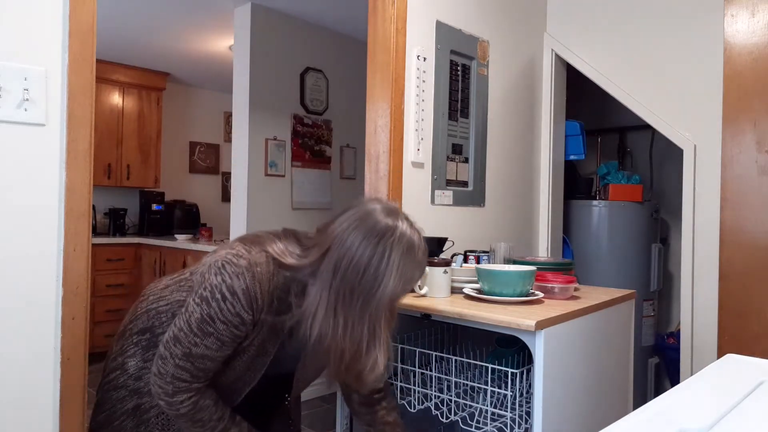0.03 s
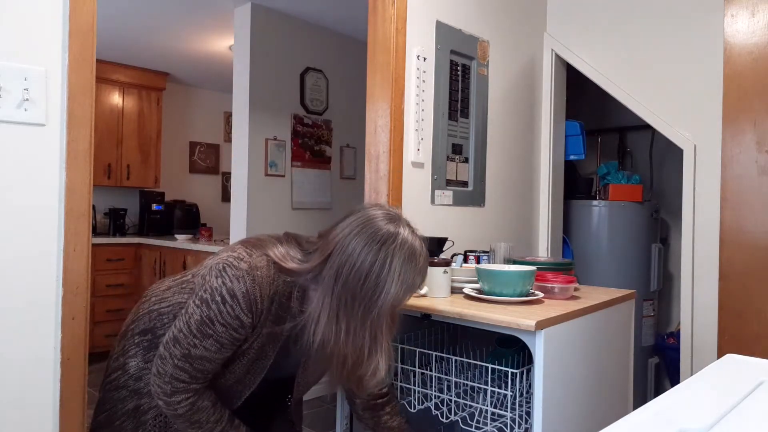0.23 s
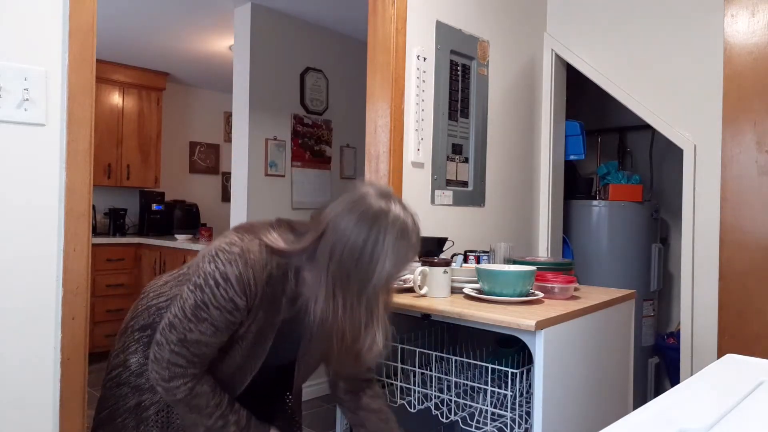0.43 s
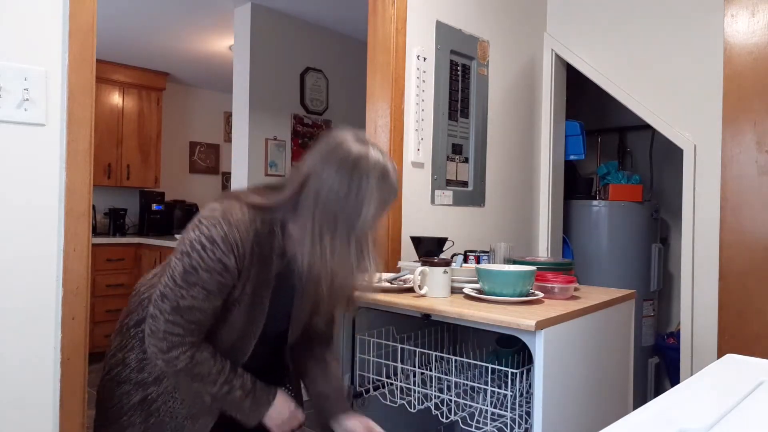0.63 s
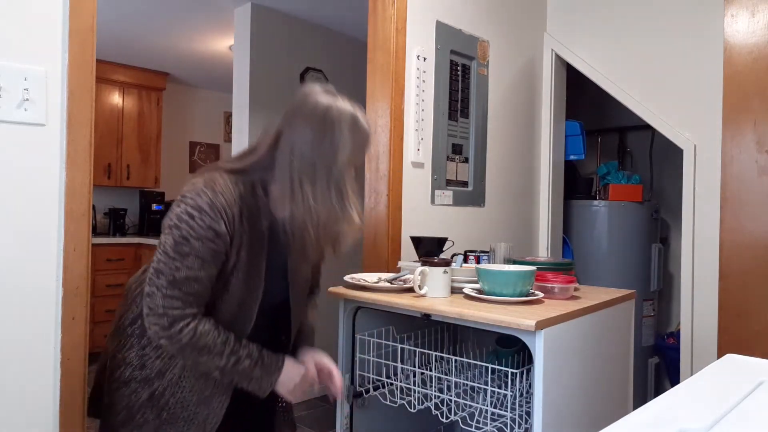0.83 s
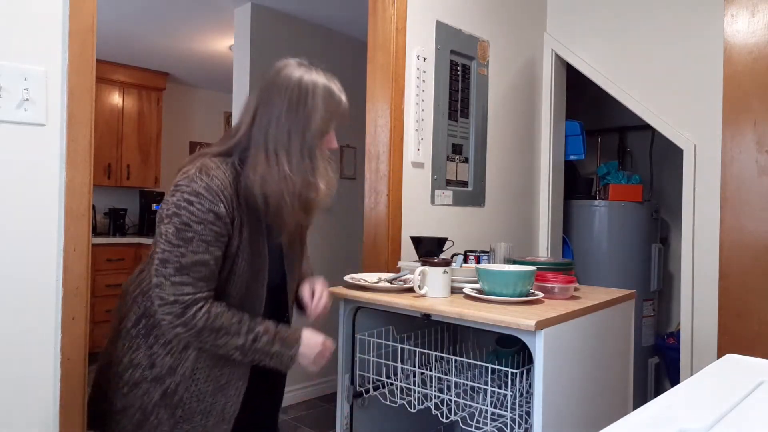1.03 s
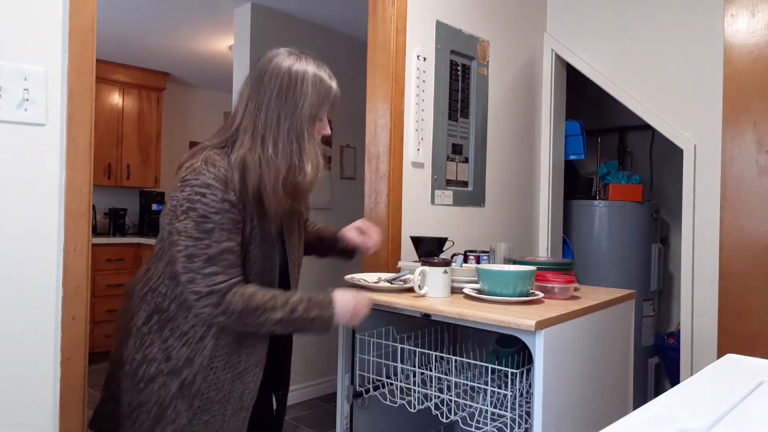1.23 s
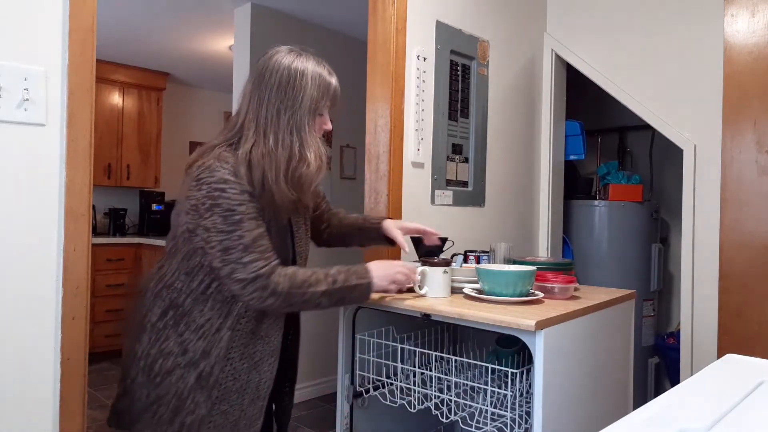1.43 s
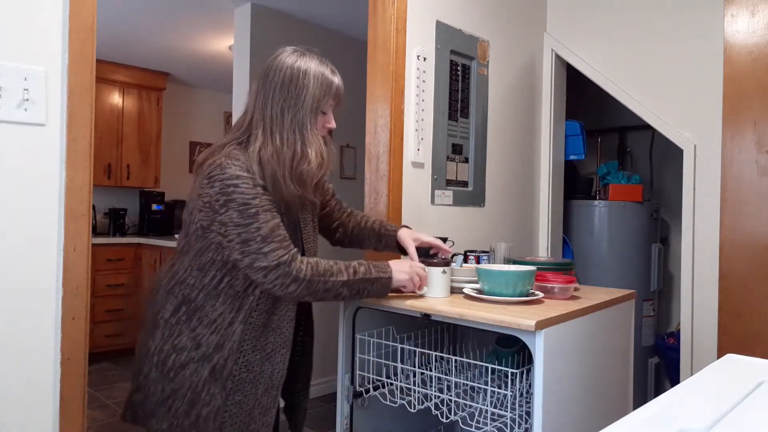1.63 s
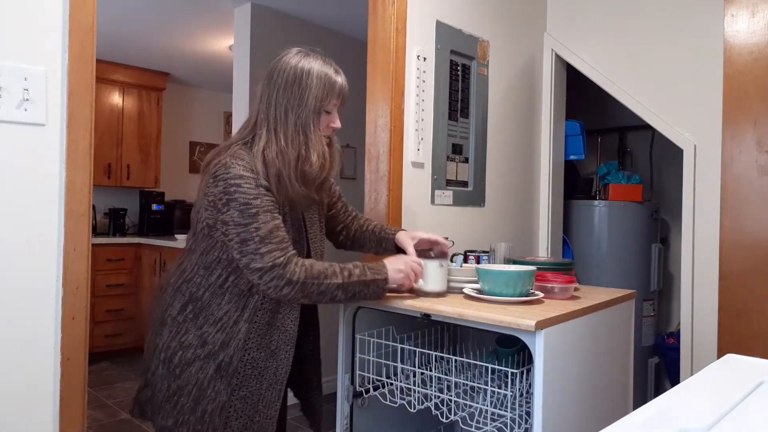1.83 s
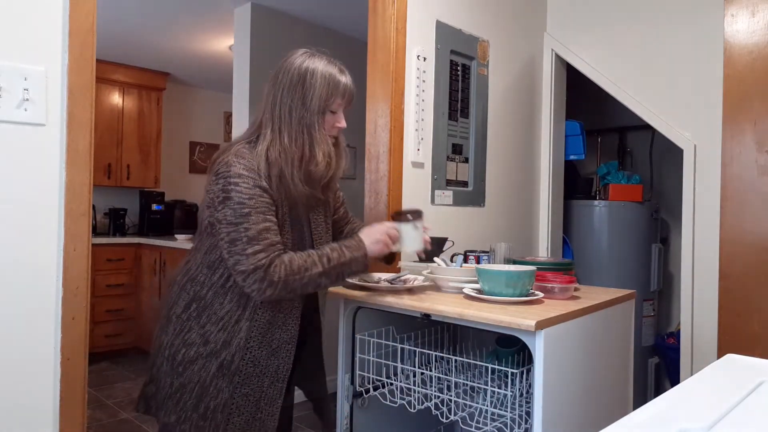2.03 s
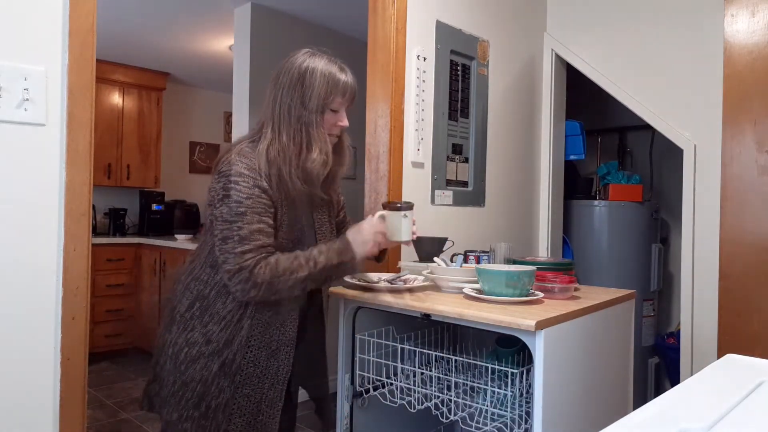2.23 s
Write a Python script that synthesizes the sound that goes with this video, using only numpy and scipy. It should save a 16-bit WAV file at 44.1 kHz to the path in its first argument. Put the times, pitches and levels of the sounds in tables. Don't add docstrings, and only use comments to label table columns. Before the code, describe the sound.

In a small kitchen heard from a few metres, a quick bright rattle of dropped steel cutlery comes first, then faint rustle and sliding crockery, a clink, double wooden knock and thin spoon jingle over low hum.

```python
import sys
import numpy as np
from scipy import signal
from scipy.fft import rfft, irfft
from scipy.io import wavfile
from scipy.ndimage import uniform_filter1d

SR = 44100
rng = np.random.default_rng(int(sys.argv[2]) if len(sys.argv) > 2 else 0)


def volts_from_db(level):
    exponent = np.asarray(level, float) / 20
    return 10 ** exponent


def generate_wav(signal):
    frames = np.transpose(np.atleast_2d(signal))
    scaled = np.clip(frames, -1, 1) * 32767
    pcm = np.round(scaled).astype(np.int16)
    wavfile.write(sys.argv[1], SR, pcm)


N = 101429

# [Hz, dB per Hz]
CRACK = [(25, -46), (50, -25), (160, -11.5), (450, -11.5), (1600, -5), (3000, -9), (5300, -12), (8500, -6),
         (16000, -11.5)]
# [Hz, dB per Hz]
BOARD = [(25, -32), (60, -14), (150, -0.5), (450, -5.5), (900, -3), (2700, -10.5), (5000, -25),
         (16000, -41)]


def cutlery():
    # [s, dB, dB]
    drops = [(0.061, -45, -69), (0.07, -32.5, -57), (.11, -46.5, -58), (.211, -27.5, -41), (.216, -22, -45),
             (0.218, -29.5, -41), (0.233, -17.5, -23), (0.257, -19.5, -24), (0.287, -10.5, -23.5),
             (0.31, -20, -35.5), (0.333, -27.5, -16.5), (.365, -14, -18), (.393, -8.5, -16.5),
             (0.41, -18, -14.5), (.429, -18.5, -21.5), (0.449, -13, -10.5), (0.471, -16, -24.5)]
    # [s, dB]
    shaking = [
        (.2, -57.5),
        (.235, -46),
        (.3, -37),
        (.46, -39),
        (.5, -59),
        (.56, -48.5),
        (.62, -67),
    ]
    start_s, dull_db, bright_db = np.transpose(drops)
    split_hz = 2800
    below = signal.butter(2, split_hz, fs=SR, output="sos")
    above = signal.butter(2, split_hz, "high", fs=SR, output="sos")
    dull = signal.sosfilt(below, colour(blows(start_s, dull_db), CRACK))
    bright = signal.sosfilt(above, colour(blows(start_s, bright_db), CRACK))
    shake = volts_from_db(level_over_time(shaking))
    rattle = colour(shake * grains(per_s=1500, uneven_db=0.62), CRACK)
    loose = jostle(shake, low_hz=700, high_hz=15000, per_s=54)
    return volts_from_db(20) * (dull + bright) + rattle + volts_from_db(-20.5) * loose


def jostle(push, low_hz, high_hz, per_s):
    pieces = [(hz, 0.041 * hz, 0) for hz in np.geomspace(low_hz, high_hz, num=18)]
    return body(pieces, lambda: push * grains(per_s, uneven_db=4))


def steel_rings():
    # [s, dB, Hz]
    forks_and_knives = [(.236, -28.5, 4450), (.236, -36.5, 8380), (.24, -33, 11000), (.24, -38.5, 9900),
                        (.255, -22, 1640), (.257, -28.5, 4500), (.255, -36.5, 10950), (.256, -35, 15100),
                        (.29, -24.5, 1632), (.292, -33.5, 780), (.333, -31, 1330), (.336, -30, 6420),
                        (.34, -25.5, 4550), (.34, -24, 8470), (.357, -27.5, 7870), (.36, -28.5, 6360),
                        (.364, -20.5, 13500), (.366, -29.5, 4540), (.37, -26, 1670), (.387, -30, 4584),
                        (.385, -29, 6350), (.393, -26, 8030), (.392, -27, 780), (.405, -24.5, 1654),
                        (.403, -30.5, 6200), (.42, -22, 1710), (.415, -32.5, 780), (.44, -28, 4557),
                        (.45, -20.5, 13610), (.452, -24, 8530), (.452, -29.5, 15100), (.455, -32.5, 6300),
                        (.47, -33, 1368), (.474, -22.5, 11320), (.476, -24, 8550), (.49, -29.5, 13700),
                        (.5, -29.5, 11200)]
    return volts_from_db(20.5) * pings(forks_and_knives, ring_s=0.006, swell_s=0.001, spread_hz=73)


def tub_booms():
    # [s, dB, Hz]
    tub = [(.085, -58.5, 295.5), (.222, -38.5, 303.8), (.3, -31.5, 294.4), (.33, -47, 301.6),
           (.4, -36, 300.2), (.47, -38, 292.6), (.55, -51.5, 297.4), (.99, -58, 298), (1.27, -59.5, 292),
           (1.39, -59.5, 299), (1.5, -47.5, 303), (1.785, -42.5, 317), (2.14, -62, 288.6)]
    return volts_from_db(29.5) * pings(tub, ring_s=0.032, swell_s=0.012, spread_hz=7)


def slide():
    # [s, dB]
    pushes = [(.58, -61), (.7, -67.5), (.77, -93), (.985, -78), (1.0, -60), (1.08, -71.5), (1.165, -84),
              (1.18, -59.5), (1.23, -57), (1.328, -64.5), (1.334, -61.5), (1.4, -53), (1.5, -47),
              (1.52, -44.5), (1.6, -70.5), (1.68, -57)]
    # [s, dB]
    lift = [
        (1.86, -42.5),
        (1.92, -46.5),
        (1.96, -45.5),
        (2.02, -45),
        (2.1, -56),
        (2.18, -63),
        (2.3, -79),
    ]
    push = volts_from_db(level_over_time(pushes)) + volts_from_db(level_over_time(lift))
    return colour(push * grains(per_s=740, uneven_db=5.9), BOARD)


def bumps():
    # [s, dB]
    thuds = [(0.086, -51.5), (0.226, -39), (0.301, -38.5), (0.459, -42.5), (.6, -58), (0.993, -59),
             (1.267, -56), (1.501, -49.5), (1.794, -70), (1.88, -69), (1.96, -76), (2.089, -48.5),
             (2.2, -56.5)]
    # [Hz, dB per Hz]
    thud_colour = [(25, -32), (55, -4), (150, -4.5), (300, -1.5), (700, -28.5), (16000, -72.5)]
    start_s, level_db = np.transpose(thuds)
    return volts_from_db(24.5) * colour(blows(start_s, level_db, chatter_s=0.06), thud_colour)


def mug_clinks():
    # [s, dB]
    clinks = [
        (1.704, -28),
        (1.712, -35.5),
        (1.72, -40),
        (1.74, -56),
        (1.755, -62),
    ]
    # [Hz, Hz, dB]
    mug_modes = [(513, 180, -16), (780, 157, -6.5), (930, 244, -0.5), (1220, 220, -14), (2850, 190, -8),
                 (3757, 106, -14), (5236, 130, -22.5), (7030, 170, -27), (9040, 190, -24), (9900, 80, -29),
                 (10750, 130, -24.5), (11800, 90, -35), (13800, 80, -38)]
    tick = colour(blows(*np.transpose(clinks)), BOARD)
    return volts_from_db(20) * struck(clinks, mug_modes) + volts_from_db(13) * tick


def board_knocks():
    # [s, dB]
    knocks = [
        (1.791, -27),
        (1.801, -26.5),
        (1.822, -35.5),
        (1.924, -42),
    ]
    # [Hz, dB per Hz]
    knock_colour = [(25, -65), (50, -13), (150, 1), (310, -2.5), (640, -10), (1500, -13), (4000, -26),
                    (16000, -37)]
    return volts_from_db(19.5) * colour(blows(*np.transpose(knocks)), knock_colour)


def spoon():
    # [s, dB]
    jingles = [
        (1.836, -29.5),
        (1.85, -45),
        (1.868, -54),
        (1.922, -44.5),
        (2.022, -51),
        (2.151, -54.5),
    ]
    # [Hz, Hz, dB]
    spoon_modes = [(5610, 150, -16), (6200, 42, -26), (6390, 29, -13), (6600, 55, -9), (7790, 26, -15.5),
                   (8600, 72, -3), (9280, 45, -1.5), (10200, 85, -2.5), (11900, 48, -11), (12400, 67, -9),
                   (13480, 54, -9), (14200, 40, -14), (14300, 28, -9), (15100, 39, -22)]
    hiss = colour(blows(*np.transpose(jingles)), CRACK)
    return volts_from_db(15.5) * struck(jingles, spoon_modes) + volts_from_db(18.5) * hiss


def crockery_touches():
    # [s, dB, Hz]
    touches = [(.65, -58, 1880), (.705, -66.5, 2140), (.995, -66, 664), (1.172, -61, 2920),
               (1.187, -63, 1097), (1.21, -57, 872), (1.222, -55, 2764), (1.25, -73, 11900),
               (1.26, -64, 2780), (1.31, -70, 2705), (1.332, -54.5, 927), (1.404, -59, 850),
               (1.43, -64, 14740), (1.457, -51.5, 1793), (1.465, -53, 2390), (1.499, -50.5, 1260),
               (1.5, -49.5, 2850), (1.508, -54.5, 4420), (1.507, -63.5, 6180), (1.509, -65, 8320),
               (1.52, -50.5, 818), (1.625, -62, 2850), (1.629, -63, 1866), (1.85, -43, 2543),
               (1.868, -49.5, 4940), (1.88, -56, 5600), (1.912, -42, 2950), (1.92, -52, 4400),
               (1.925, -54, 6150), (1.975, -54, 4660), (1.98, -48, 2850), (2.0, -51, 4634),
               (2.004, -47.5, 1100), (2.037, -54.5, 4620), (2.04, -49, 2795), (2.088, -49, 2410),
               (2.09, -57, 4490), (2.125, -58, 2400), (2.15, -58, 4880), (2.18, -62, 4850),
               (2.21, -67, 3340), (2.23, -66, 2430), (2.24, -68, 1467)]
    return volts_from_db(27) * pings(touches, ring_s=0.0083, swell_s=0.00091, spread_hz=87.5)


def sleeve():
    # [s, dB]
    rustle = [(.66, -83), (.72, -74), (.8, -104), (.93, -87), (1.01, -67.5), (1.05, -62.5), (1.1, -101),
              (1.17, -77), (1.24, -73), (1.3, -120), (1.405, -95), (1.425, -63), (1.52, -92), (1.62, -107),
              (2.1, -72), (2.16, -70.5), (2.25, -112.5)]
    # [Hz, dB per Hz]
    cloth = [(300, -38), (3000, -11), (6000, -6), (8600, -0.5), (16000, -13.5)]
    return volts_from_db(level_over_time(rustle) + 1) * colour(grains(per_s=6000, uneven_db=7.5), cloth)


def kitchen(x, rings):
    # [Hz, s]
    room_t60 = [(60, 0.9), (250, 1), (1000, 0.29), (4000, 0.49), (12000, 0.28)]
    # [Hz, Hz, dB]
    standing = [(153, 30, -26.5), (306, 20, -29)]
    direct_db, build_s = -14.5, 0.0028
    bend_db = 612
    early_s, late_db = 0.011, -12
    dip_hz, dip_width_hz = 235.4, 49
    t = np.arange(SR // 2) / SR

    def decay(hz):
        t60 = at_hz(room_t60, hz)
        return volts_from_db(-60 * t / t60 - bend_db * t ** 2) / np.sqrt(t60)

    tail = pair(len(t), decay) * (1 - np.exp(-t / build_s))
    power = uniform_filter1d(np.abs(rfft(tail, 8 * 8192)) ** 2, size=45, axis=1)[:, ::8]
    hz = np.arange(1, 4098) * SR / 8192
    even = [np.c_[hz, -10 * np.log10(p + 1e-6 * p.max())] for p in power]
    tail = np.array([colour(side, e)[:len(t)] for side, e in zip(tail, even)])
    tail = unit_energy(tail)
    tail[:, 0] += volts_from_db(direct_db)
    early = unit_energy(tail * (np.exp(-t / early_s) + volts_from_db(late_db)))

    wet = signal.fftconvolve(tail, x[None], axes=1)[:, :N] + body(standing, lambda: x)
    wet = wet - signal.lfilter(*signal.iirpeak(dip_hz, dip_hz / dip_width_hz, fs=SR), wet)
    return wet + signal.fftconvolve(early, rings[None], axes=1)[:, :N]


def house_floor():
    # [Hz, dB per Hz]
    hum_and_hiss = [(20, -41.5), (65, 1), (220, -3.5), (400, -15), (1500, -22.5), (6500, -33),
                    (8500, -24.5), (16000, -31.5)]
    return volts_from_db(-72) * unit(colour(pair(N, lambda hz: 1), hum_and_hiss))


def pair(size, shape):
    # [Hz, 0-1]
    likeness = [(100, 0.92), (300, 0.72), (600, 0.69), (1200, 0.024)]
    out, edges = 0, 25 * 2 ** np.arange(0, 9.6, 0.5)
    for low, high in zip(edges, edges[1:]):
        band = signal.butter(2, [low, high], "band", fs=SR, output="sos")
        mid, side = signal.sosfilt(band, rng.standard_normal((2, size)))
        hz = np.sqrt(low * high)
        alike = at_hz(likeness, hz)
        out = out + shape(hz) * (np.sqrt(1 + alike) * mid + np.sqrt(1 - alike) * side * [[1], [-1]])
    return out


def pings(rows, ring_s, swell_s, spread_hz):
    t, out = np.arange(SR // 4) / SR, np.zeros(N + SR)
    envelope = np.exp(-t / ring_s) * (1 - np.exp(-t / swell_s))
    strengths = np.array([0.5, 0.92, 0.81])
    for (start_s, level_db, hz), draw in zip(rows, rng.random((len(rows), 6))):
        pitch = hz + spread_hz * (np.array([-1, 0, 1]) + draw[:3] - 0.5)
        partials = np.sin(2 * np.pi * (pitch[:, None] * t + draw[3:, None]))
        first = int(start_s * SR)
        out[first:first + len(t)] += volts_from_db(level_db) * unit_energy(envelope * (strengths @ partials))
    return out[:N]


def struck(rows, modes):
    start_s, level_db = np.transpose(rows)
    return body(modes, lambda: blows(start_s, level_db))


def body(modes, drive):
    out = np.zeros(N)
    for hz, width_hz, db in modes:
        r = np.exp(-np.pi * 1.5 * max(width_hz, 28) / SR)
        sos = 2 * [[0.92, 0.013, -1.1, 1, -2 * r * np.cos(2 * np.pi * hz / SR), r * r]]
        energy = np.sum(signal.sosfilt(sos, signal.unit_impulse(4096)) ** 2)
        out += volts_from_db(db) * signal.sosfilt(sos, drive() + 1e-18) / np.sqrt(energy)
    return out


def blows(start_s, level_db, chatter_s=0.0047):
    hits = np.zeros(N)
    np.add.at(hits, (np.asarray(start_s) * SR).astype(int), volts_from_db(level_db))
    t = np.arange(SR // 5) / SR
    chatter = np.exp(-t / chatter_s) * (1 - np.exp(-t / 0.00035))
    return signal.fftconvolve(hits, unit_energy(chatter))[:N] * rng.standard_normal(N)


def grains(per_s, uneven_db):
    size = volts_from_db(uneven_db * np.minimum(rng.exponential(1, N), 4)) * rng.choice([-1, 1], N)
    return unit(size * (rng.random(N) < per_s / SR))


def colour(x, spectrum):
    cepstrum = irfft(at_hz(spectrum, np.arange(4097) * SR / 8192 + 1) * np.log(10) / 20)
    cepstrum[1:4096] *= 2
    cepstrum[4097:] = 0
    h = unit_energy(irfft(np.exp(rfft(cepstrum)))[:4096])
    return signal.fftconvolve(x, h.reshape((1,) * (x.ndim - 1) + (-1,)), axes=-1)[..., :N]


def at_hz(points, hz):
    p = np.array(points)
    return np.interp(np.log(hz), np.log(p[:, 0]), p[:, 1])


def level_over_time(rows):
    time_s, level_db = np.transpose(rows)
    return np.interp(np.arange(N) / SR, time_s, level_db, -140, -140)


def unit(x):
    return x / np.sqrt(np.mean(x ** 2) + 1e-30)


def unit_energy(x):
    return x / np.sqrt(np.sum(x ** 2, axis=-1, keepdims=True))


def scene():
    contacts = cutlery() + slide() + bumps() + mug_clinks() + board_knocks() + spoon() + sleeve()
    heard = kitchen(contacts, steel_rings() + crockery_touches())
    boom = tub_booms()
    boom_pair = [boom, np.roll(boom, shift=12)]
    left_db = 1.56
    return (heard + boom_pair + house_floor()) * volts_from_db([[left_db / 2], [-left_db / 2]])


def low_pass(x):
    return signal.sosfilt(signal.butter(12, 16310, fs=SR, output="sos"), x)


def record(dry):
    steep = signal.ellip(14, 1, 80, 15800, fs=SR, output="sos")
    mix = signal.sosfilt(steep, dry)
    return low_pass(mix)


dry = scene()
out = record(dry)
generate_wav(out)
```